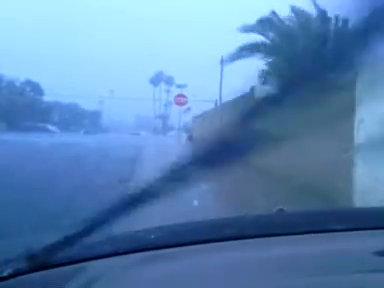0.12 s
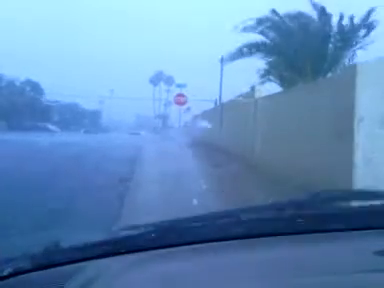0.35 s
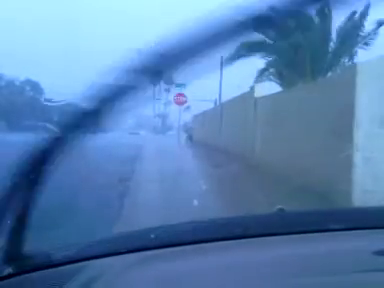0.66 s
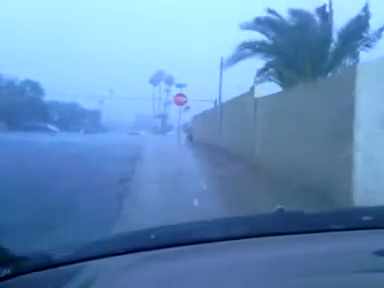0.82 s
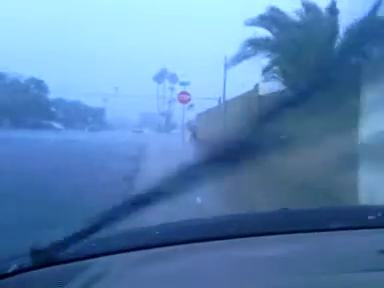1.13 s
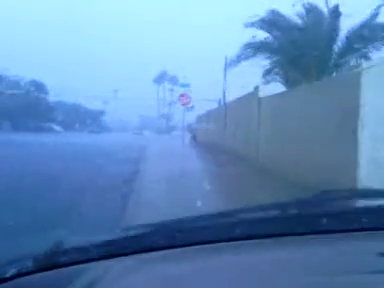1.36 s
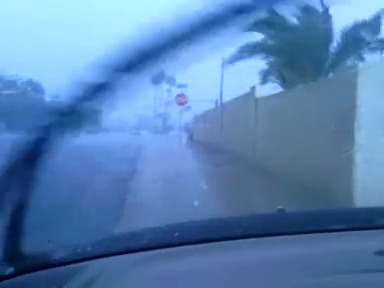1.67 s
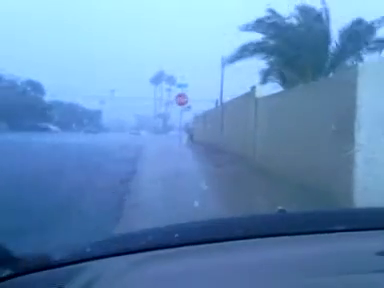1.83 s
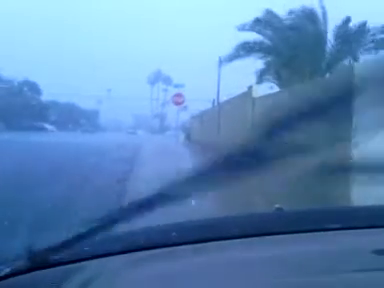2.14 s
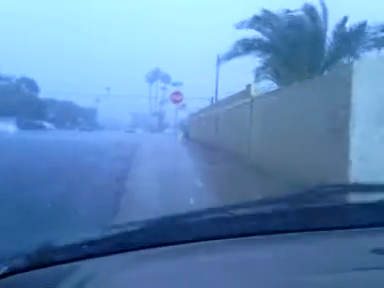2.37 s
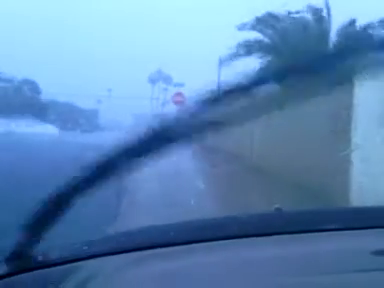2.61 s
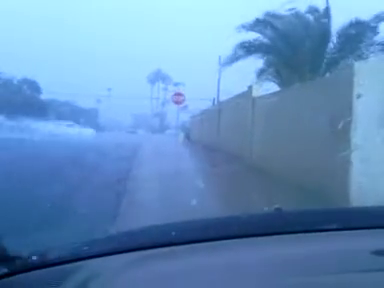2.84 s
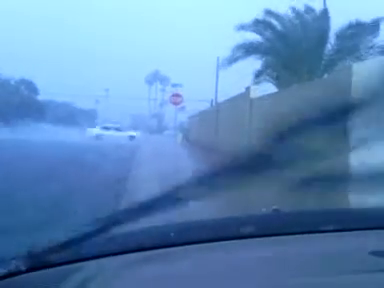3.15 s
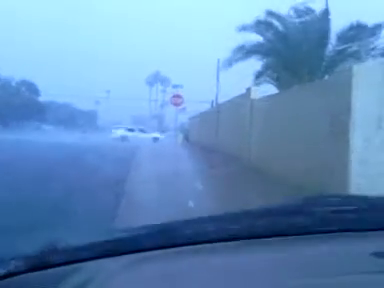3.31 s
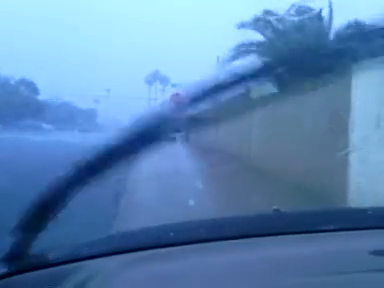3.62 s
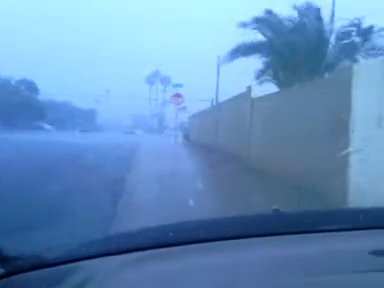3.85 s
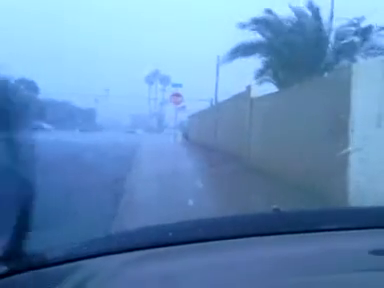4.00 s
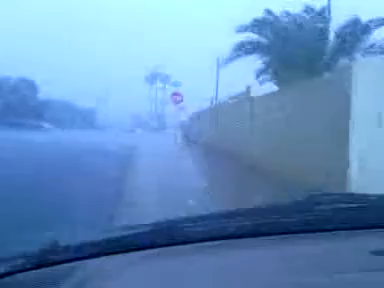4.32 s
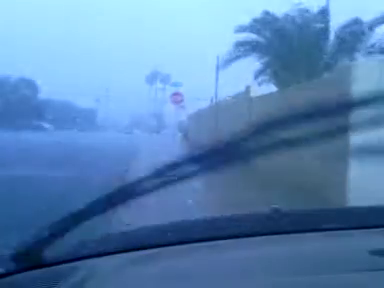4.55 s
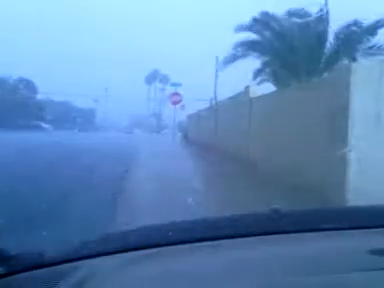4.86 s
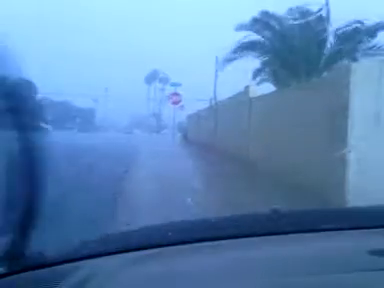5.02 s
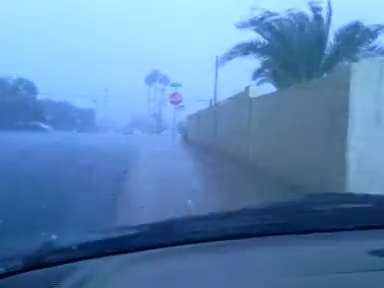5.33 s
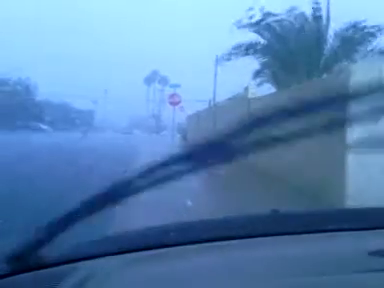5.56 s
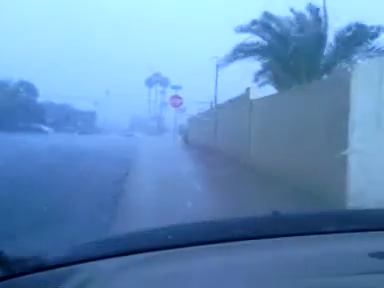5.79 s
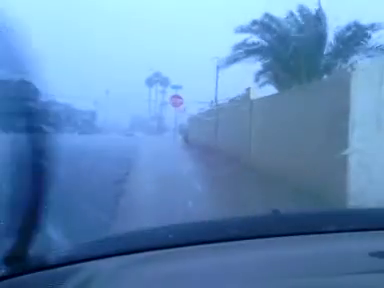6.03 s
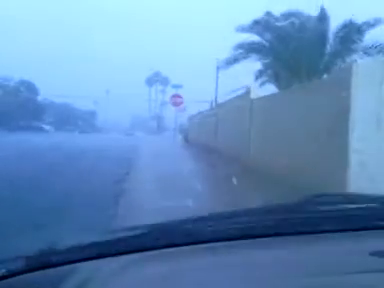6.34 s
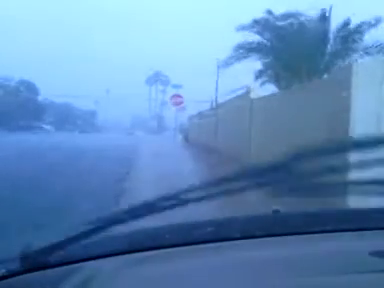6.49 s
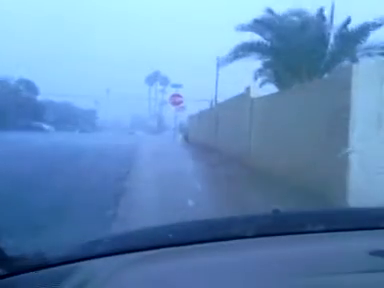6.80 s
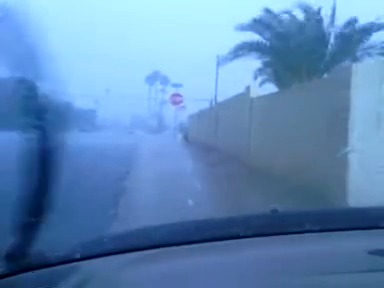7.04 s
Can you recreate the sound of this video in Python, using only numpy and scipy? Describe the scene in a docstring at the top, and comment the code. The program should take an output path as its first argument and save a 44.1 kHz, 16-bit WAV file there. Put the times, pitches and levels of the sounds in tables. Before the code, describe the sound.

For about seven seconds, heavy hail strikes a standing car, heard from the seat in a small, dry cabin. From the first instant, irregular hard clacks on the steel roof overlap, each with a short hollow drumming around the low mids, while brighter, splintering crashes hit the windshield. Heavy roof clusters come near 0.4, 0.8 and 1.3 seconds, and the lesser stones swell around 1.5. Strong glass blows land near 1.7, 2.2 and 2.45, with a big drumming hit at 2.4. From 3 to 5 seconds blows remain frequent but more uneven, with metallic clanks near 3.3, 3.6 and 4.5 and booms around 4.2. After 5 seconds it thins slightly, with a strong blow near 6.1 and a sharp glass tick near 6.9, and continues to the end. Dull rain lies underneath. The sound is mono, midrange-heavy, with clipped, crunchy peaks.

```python
"""Big hailstones hammer the steel roof and the windshield of a standing car, heard from the seat.
Each blow is a burst of noise shaped like panel waves, brighter on glass; decaying roof modes add the drumming.
Lesser stones and a dull wash of rain fill the gaps, with glass ticks and pitched steel pings among them.
The microphone hears only the speech band, and the big blows overload the amplifier behind it."""
import sys
import numpy as np
from scipy.fft import rfft, irfft, next_fast_len
from scipy.io import wavfile

SR = 44100
rng = np.random.default_rng(int(sys.argv[2]) if len(sys.argv) > 2 else 0)


def inscribe(sig):
    """Save sig as 16-bit PCM at rate SR to the path in sys.argv[1].

    A 1-D sig is mono; a 2-D sig holds one channel per row.
    Samples are clipped to [-1, 1] before scaling.
    """
    pcm = np.round(np.clip(np.atleast_2d(sig).T, -1, 1) * 32767)
    wavfile.write(sys.argv[1], SR, pcm.astype(np.int16))


N = 316197

# Big stones on the steel roof; the drumming is weak over a rib.
# Each row: start in seconds, clack level in dB, drumming level in dB.
ROOF_BLOWS = [(0.016, -7, -12.5), (.102, -14.5, -25), (.146, -16, -24.5), (.224, -8.5, -6),
              (.392, -8.5, -14), (.417, -1.5, -3), (0.447, -7.5, -13), (.48, -10, -26),
              (0.506, -7.5, -11.5), (0.542, -6, -10.5), (0.609, -5, -10.5), (0.757, -16, -23.5),
              (.81, -3.5, 1), (.835, -4, -10), (.89, -10, -32), (.923, -8, -5), (1.113, -13.5, -19.5),
              (1.241, -13.5, -43), (1.277, -5, -6.5), (1.297, -4.5, -1), (1.326, -1.5, -13),
              (1.347, -1.5, -7.5), (1.396, -14.5, -21), (1.432, -12, -18), (1.5, -10.5, -14.5),
              (1.573, -7, -18.5), (1.609, -6, -5), (1.653, -3.5, -4), (1.735, -8, -14.5),
              (1.786, -7, -18.5), (1.858, -18.5, -19), (1.927, -4, -15), (1.985, -17, -29),
              (2.024, -10.5, -15.5), (2.104, -8.5, -16), (2.145, -7.5, -15.5), (2.178, -10, -13),
              (2.208, -9.5, -30.5), (2.361, -3.5, -10), (2.385, -8, -19.5), (2.414, -2, -0.5),
              (2.516, -4, -11), (2.552, -3.5, -15), (2.731, -4, -8.5), (2.789, -4, -16.5), (2.865, -5, -12),
              (3.022, -10.5, -22.5), (3.069, -2.5, -13), (3.291, -12, -34.5), (3.331, -15, -15),
              (3.481, -16.5, -19), (3.554, -3, -18), (3.695, -12.5, -15.5), (3.726, -7.5, -21.5),
              (3.847, -7, -11), (3.893, -13, -11), (3.943, -15, -21), (4.151, -11, -21), (4.218, -4, -4),
              (4.35, -17.5, -12), (4.388, -10.5, -15), (4.459, -9, -9), (4.496, -6, -2.5),
              (4.551, -11.5, -16), (4.669, -6.5, -8), (4.804, -13.5, -32), (5.096, -20.5, -26.5),
              (5.171, -12.5, -14.5), (5.199, -13.5, -23), (5.316, -10, -19.5), (5.392, -11, -9.5),
              (5.683, -21, -12), (5.785, -9, -18), (5.82, -9.5, -19), (5.845, -5, -14.5),
              (5.929, -8.5, -21.5), (5.97, -10, -22), (6.007, -11, -16), (6.061, -15.5, -29),
              (6.092, -2, -4.5), (6.277, -12, -14.5), (6.322, -8, -10), (6.355, -11, -12.5),
              (6.543, -5, -15.5), (6.636, -5.5, -14), (6.67, -19.5, -18.5), (6.775, -10, -6.5),
              (7.024, -13, -22), (7.05, -9, -28), (7.092, -13, -18)]


def amp(db):
    """Decibels to gain."""
    return 10 ** (np.asarray(db) / 20)


def along(points, hz):
    """Read a curve of (Hz, value) points on a log frequency axis."""
    point_hz, value = np.transpose(points)
    return np.interp(np.log(hz + 1), np.log(point_hz), value)


def filtered(x, response):
    """Shape the spectrum of x by a response, a function of frequency in Hz."""
    size = next_fast_len(x.shape[-1] + SR // 20)
    spectrum = rfft(x, size) * response(np.fft.rfftfreq(size, 1 / SR))
    return irfft(spectrum, size)[..., :x.shape[-1]]


def at_level(bursts, db):
    """Give each row the energy of a 20 ms burst at its level in dB."""
    energy = np.sum(bursts ** 2, 1, keepdims=True)
    return bursts * amp(db)[:, None] / np.sqrt(energy / (0.02 * SR) + 1e-20)


def placed(times, bursts):
    """Sum the rows, each starting at its time in seconds."""
    starts = np.round(np.maximum(times, 0) * SR).astype(int)
    index = starts[:, None] + np.arange(bursts.shape[1])
    return np.bincount(index.ravel(), bursts.ravel(), N)[:N]


def clacks(db, tilt, spot_db, swell, contact, fall, cabin_db, cabin_t60):
    """Bending waves spread over a panel: sharp contact, brief swell, fast fall, then the cabin's ring.

    tilt is in dB per octave; swell and cabin_t60 are in seconds."""
    # Dense upper modes of glass and steel. Each row: frequency in Hz, density in dB per Hz.
    panel_modes = [(250, -22.5), (520, 6.5), (620, 2.5), (740, 6), (880, 0.5), (1150, 4.5), (1330, 3),
                   (1650, 5), (1950, 2), (2300, -3.5), (3300, -8.5), (4500, -16.5)]
    rattle_db, rattle_hz = 2.0, 380  # depth and rate of the uneven packets
    trim_hz = 2300
    count = len(db)
    t = np.arange(SR // 6) / SR
    spots, returns = rng.standard_normal((2, count, 100))
    knots = np.arange(spots.shape[1])

    def colour(hz):
        """Every spot favours other modes, and the tilt sets how bright the blow is."""
        ripple = np.array([np.interp(hz, knots * 230, spot) for spot in spots])
        octaves = np.log2(np.clip(hz, 500, 3500) / 1400)
        return amp(along(panel_modes, hz) + spot_db * ripple + tilt[:, None] * octaves)

    waves = filtered(rng.standard_normal((count, len(t))), colour)
    age = t / swell
    # the ice shatters and the waves come back from the panel's edges in uneven packets
    unevenness = np.array([np.interp(t * rattle_hz, knots, row) for row in returns])
    blow = waves * amp(rattle_db * unevenness) * (contact + age) * np.exp(-age ** fall)
    # seats and trim soak up the treble of the cabin's ring
    dulled = filtered(waves, lambda hz: 1 / np.sqrt(1 + (hz / trim_hz) ** 4))
    cabin = dulled * amp(cabin_db - 60 * t / cabin_t60) * (1 - np.exp(-age))
    return at_level(blow + cabin, db)


def thuds(db, centre_hz, octaves, t60, rise, detune, scatter_db=3.5):
    """The roof's modes ring at new strengths for each stone, favouring those near its centre frequency.

    t60 is the decay in seconds of a 200 Hz mode; rise is in seconds."""
    # Drum modes of the roof sheet. Each row: frequency in Hz, relative strength in dB.
    roof_modes = [(82, -1.5), (104, -0.5), (127, 1.5), (156, 3.5), (183, -1.5), (212, -2.5), (238, 0),
                  (272, -0.5), (302, 1), (335, 4), (369, 5), (400, 6.5), (448, 5), (492, -2.5)]
    hz, mode_db = np.transpose(roof_modes)
    t = np.arange(SR // 3) / SR
    chance = rng.standard_normal((len(db), 3, len(hz)))
    near = np.exp(-0.5 * (np.log2(hz / centre_hz[:, None]) / octaves) ** 2)
    phase = np.exp(2j * np.pi * chance[:, 1])
    strength = near * amp(mode_db + scatter_db * chance[:, 0]) * phase
    life = t60 * (200 / hz) ** 0.55  # higher modes die sooner
    rings = amp(-60 * t / life[:, None]) * np.exp(2j * np.pi * hz[:, None] * t)
    drumming = (strength @ rings).real
    # each bay between the roof ribs is tuned a little differently
    stretch = np.exp(detune * chance[:, 2, 0])
    bays = np.array([np.interp(t * ratio, t, ring) for ratio, ring in zip(stretch, drumming)])
    return at_level(bays * (1 - np.exp(-t / rise)), db)


def strikes(s, clack_db, thud_db, roof_hz):
    """A stone clacks and drums the roof; the louder it is and the more it drums, the duller its clack."""
    tilt_db, hardness_scatter_db = -0.84, 0.57  # dB per octave: base slope, and its spread between stones
    roof_dulls, size_dulls = 0.14, 0.02  # slope lost per dB of drumming over clack, and per dB of clack
    scatter_octaves = 0.12  # how the thud's centre varies with the spot
    hardness, spot = rng.standard_normal((len(s), 2)).T
    dulling = roof_dulls * (thud_db - clack_db) + size_dulls * clack_db
    tilt = tilt_db - dulling + hardness_scatter_db * hardness
    centre_hz = roof_hz * 2 ** (scatter_octaves * spot)
    clack = clacks(clack_db, tilt, spot_db=4.0, swell=0.019, contact=0.38, fall=1.77,
                   cabin_db=0, cabin_t60=0.15)
    thud = thuds(thud_db, centre_hz, octaves=0.72, t60=0.23, rise=0.012, detune=0.0392)
    return placed(s, clack) + placed(s, thud)


def rain(level_db=-28.5):
    """Countless drops merge into a dull wash on the body shell: steady shaped noise."""
    # Spectrum of the wash. Each row: frequency in Hz, density in dB per Hz before levelling.
    wash_curve = [(20, -31.5), (50, -5), (90, 10.5), (220, 10), (550, 0), (1700, -5), (2500, -11.5),
                  (4000, -20)]
    wash = filtered(rng.standard_normal(N), lambda hz: amp(along(wash_curve, hz)))
    return amp(level_db) * wash / wash.std()


def shower_db(s):
    """How far the shower of lesser stones is above or below the mean of its points, in dB."""
    # Strength of the shower. Each row: time in seconds, strength in dB before the mean is taken off.
    shower_curve = [(0.0, -11.5), (0.82, -6.5), (1.06, -27.5), (1.54, 5), (1.92, -27.5), (2.37, -20.5),
                    (2.54, -31.5), (3.71, -14.5), (3.97, -12), (4.45, -14), (4.75, -22), (6.47, -22.5),
                    (6.85, -48), (7.17, -7)]
    times, db = np.transpose(shower_curve)
    return np.interp(s, times, db) - db.mean()


def small_hail(count=600, mean_db=-35.0, spread_db=2.5, follows=0.36):
    """Pea-sized stones patter at random, too light to drum the roof, louder as the shower swells."""
    s = rng.uniform(0, N / SR, count)
    size, hardness = rng.standard_normal((count, 2)).T
    db = mean_db + follows * shower_db(s) + spread_db * size
    patter = clacks(db, 1.6 + 2.0 * hardness, spot_db=4, swell=0.001, contact=0.88, fall=0.9,
                    cabin_db=-10.5, cabin_t60=0.075)
    return placed(s, patter)


def medium_hail(count=90, mean_db=-27, spread_db=5.0, follows=0.49, thud_db=-4, roof_hz=150):
    """Lesser stones keep falling, one in each equal slice of time, heavier as the shower swells."""
    place, size = rng.uniform(size=(count, 2)).T
    s = (np.arange(count) + place) * N / SR / count
    db = mean_db + follows * shower_db(s) + spread_db * (2 * size - 1)
    return strikes(s, db, db + thud_db, roof_hz)


def glass_ticks(gain_db=0.5, tilt_db=3.0):
    """Small hard pellets snap on the windshield close by, with hardly any ring."""
    # Sharp ticks. Each row: start in seconds, level in dB before the gain.
    pellets = [(1.442, -23), (1.502, -18), (3.146, -15.5), (3.697, -16), (3.944, -28), (4.001, -19),
               (4.122, -18), (5.553, -21.5), (5.598, -25.5), (6.919, -12)]
    s, db = np.transpose(pellets)
    ticks = clacks(db + gain_db, np.full(len(s), tilt_db), spot_db=-0.5, swell=0.0027, contact=0.45,
                   fall=0.76, cabin_db=-12, cabin_t60=0.05)
    return placed(s, ticks)


def steel_pings(width=0.16, t60=0.13, life_slope=0.25):
    """A cluster of close modes gives a short, pitched clank or boom; low patches ring longer.

    width is relative to the pitch; t60 is the decay in seconds at 1000 Hz."""
    # Stones that set one patch of steel ringing, a boom on the wide roof or a clank on a stiff edge.
    # Each row: start in seconds, level in dB, pitch in Hz.
    patches = [(.235, -4.5, 201), (.255, -9.5, 167), (.352, -8, 315), (.63, -16.5, 170.5),
               (0.963, -11, 312), (2.185, -11.5, 1267), (2.873, -8.5, 126), (3.292, -13.5, 1420),
               (3.4, -12, 161.4), (3.572, -9.5, 974), (4.237, -7, 207.4), (4.24, -12.5, 158),
               (4.354, -7.5, 162), (4.504, -6.5, 1035), (4.76, -22, 136), (5.02, -14.5, 204),
               (5.34, -14, 136), (5.683, -12, 295), (5.825, -13, 1150), (6.105, -9, 372), (6.275, -12, 396),
               (6.35, -11.5, 155), (6.425, -12.5, 159), (6.79, -23, 152), (7.05, -12, 1185)]
    s, db, hz = np.transpose(patches)
    pitch = hz[:, None]
    t = np.arange(SR // 3) / SR
    noise = rng.standard_normal((len(s), len(t)))
    cluster = filtered(noise, lambda f: np.exp(-((f / pitch - 1) / width) ** 2))
    life = t60 * (1000 / pitch) ** life_slope
    return placed(s, at_level(cluster * np.sqrt(t) * amp(-60 * t / life), db))


def roof_flex(below_db=-17, centre_hz=85, octaves=0.61, t60=0.2):
    """A blow also bends the whole roof, which pushes on the air in the cabin: a low burst of noise."""
    s, _, thud_db = np.transpose(ROOF_BLOWS)
    t = np.arange(SR // 3) / SR
    noise = rng.standard_normal((len(s), len(t)))
    push = filtered(noise, lambda hz: np.exp(-0.5 * (np.log2((hz + 1) / centre_hz) / octaves) ** 2))
    return placed(s, at_level(push * np.sqrt(t) * amp(-60 * t / t60), thud_db + below_db))


def windshield_hail(tilt_db=4.5, frame_db=-9, frame_hz=230):
    """Glass gives a bright crash; only a little of the blow passes through the frame to the roof."""
    # Big stones that shatter on the windshield. Each row: start in seconds, crash level in dB.
    glass_blows = [(.052, -5), (.172, -9.5), (.317, -15), (.346, -5.5), (.648, -1.5), (.723, -6.5),
                   (.958, -5.5), (0.993, -9.5), (1.048, -11), (1.199, -9.5), (1.535, -8.5), (1.699, -2),
                   (1.948, -9), (2.064, -6), (2.24, -2), (2.443, -3), (2.486, -3.5), (2.583, -11.5),
                   (2.684, -21), (2.96, -17.5), (2.991, -9.5), (3.055, -7), (3.17, -4.5), (3.205, -8),
                   (3.391, -5), (3.441, -11), (3.639, -6.5), (3.796, -2.5), (3.823, -7), (4.115, -26.5),
                   (4.275, -5), (4.418, -13.5), (4.609, -20), (4.76, -11), (5.009, -4.5), (5.275, -5),
                   (5.468, -9), (5.582, -18), (6.246, -9.5), (6.415, -9), (6.588, -5), (6.918, -20.5),
                   (6.97, -6.5), (7.143, -9.5)]
    s, db = np.transpose(glass_blows)
    crash = clacks(db, np.full(len(s), tilt_db), spot_db=4.5, swell=0.024, contact=0.45, fall=2.36,
                   cabin_db=-8.5, cabin_t60=0.24)
    thud = thuds(db + frame_db, np.full(len(s), frame_hz), octaves=0.86, t60=0.27, rise=0.0098,
                 detune=0.029)
    return placed(s, crash) + placed(s, thud)


def roof_hail(roof_hz=261.4):
    """The big stones clack on the steel roof and set its modes drumming around roof_hz."""
    s, clack_db, thud_db = np.transpose(ROOF_BLOWS)
    return strikes(s, clack_db, thud_db, roof_hz)


def scene():
    """Everything that falls on the car, as one channel."""
    lesser = rain() + small_hail() + medium_hail()
    details = glass_ticks() + steel_pings()
    big_stones = roof_flex() + windshield_hail() + roof_hail()
    return (lesser + details + big_stones)[None]


def record(dry, band_hz=3600, skirt_hz=520, ceiling=0.69, knee=22, top_hz=15900):
    """A speech-band microphone, then an overloaded amplifier: flattened peaks make the treble."""
    heard = filtered(dry, lambda hz: np.exp(-(np.maximum(hz - band_hz, 0) / skirt_hz) ** 2))
    clipped = heard / (1 + np.abs(heard / ceiling) ** knee) ** (1 / knee)
    return filtered(clipped, lambda hz: hz < top_hz)


dry = scene()
out = record(dry)
inscribe(out)
```